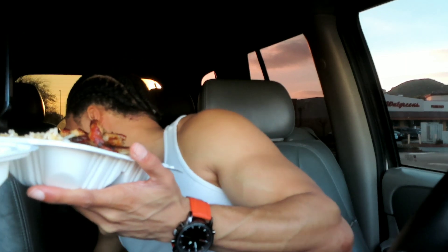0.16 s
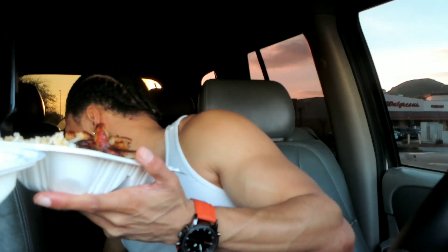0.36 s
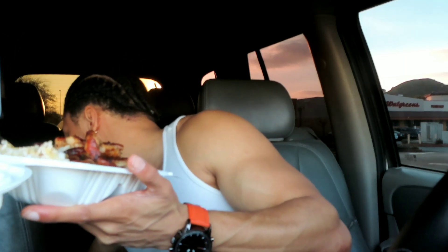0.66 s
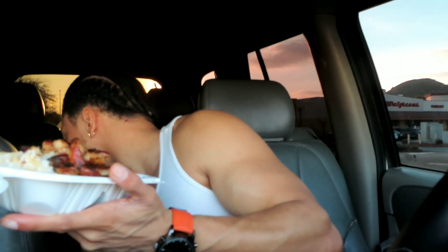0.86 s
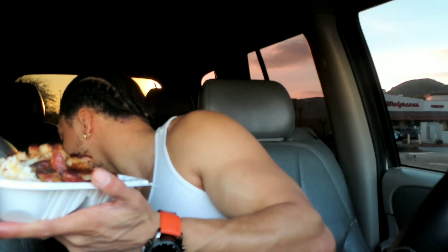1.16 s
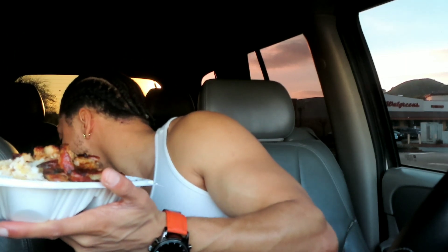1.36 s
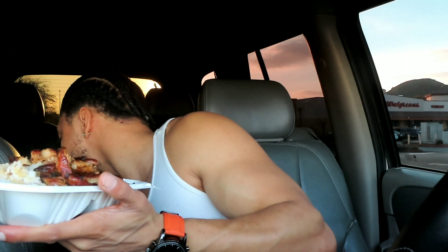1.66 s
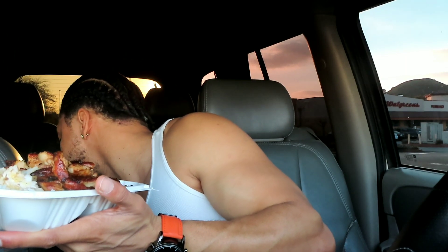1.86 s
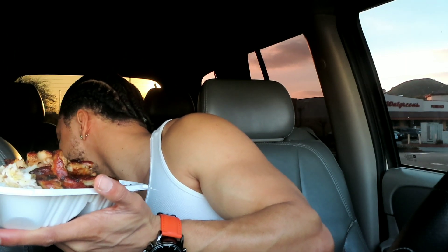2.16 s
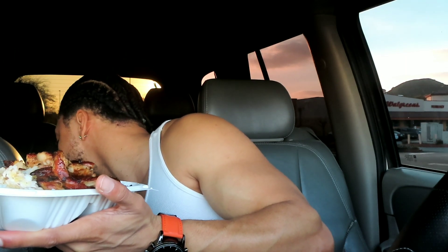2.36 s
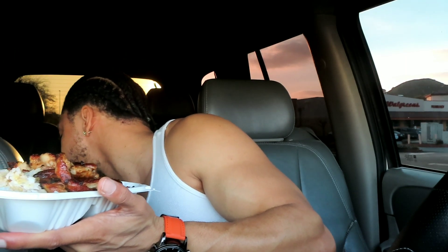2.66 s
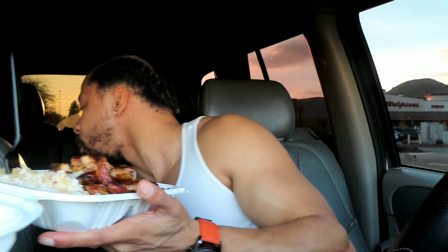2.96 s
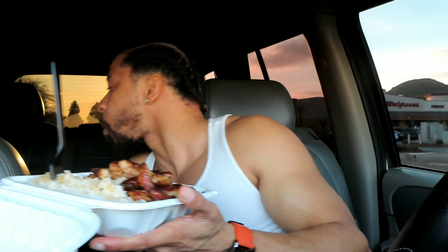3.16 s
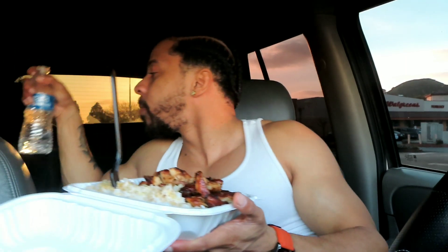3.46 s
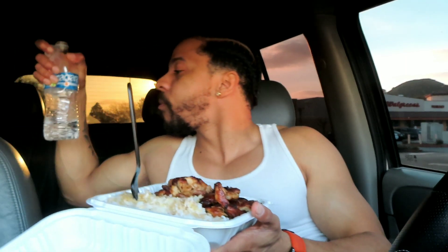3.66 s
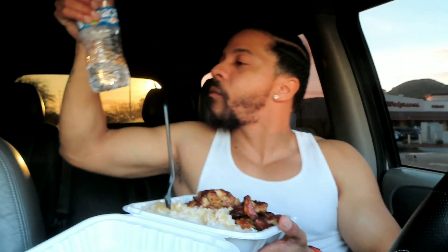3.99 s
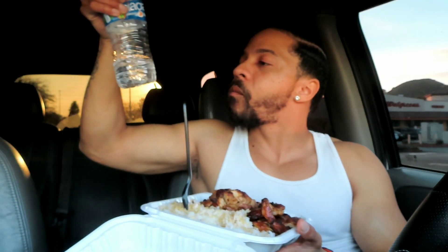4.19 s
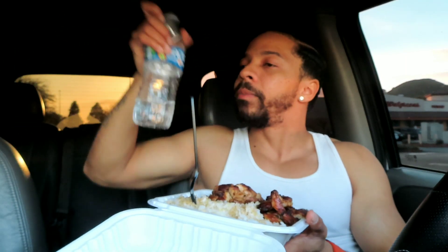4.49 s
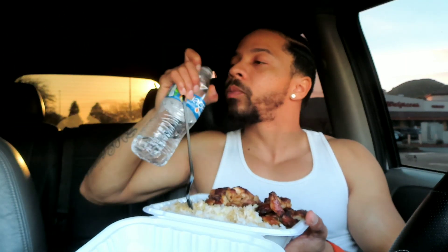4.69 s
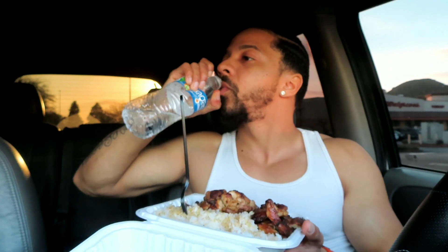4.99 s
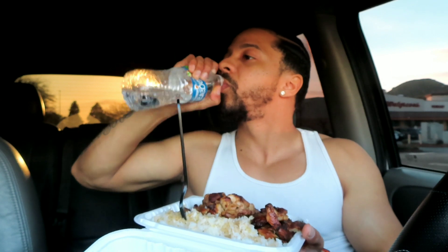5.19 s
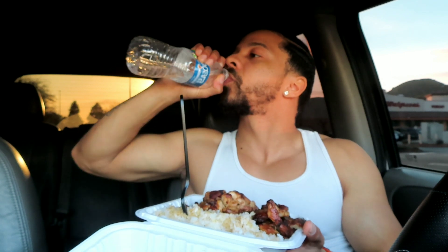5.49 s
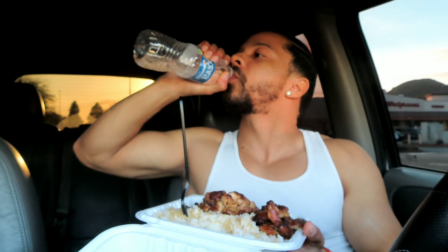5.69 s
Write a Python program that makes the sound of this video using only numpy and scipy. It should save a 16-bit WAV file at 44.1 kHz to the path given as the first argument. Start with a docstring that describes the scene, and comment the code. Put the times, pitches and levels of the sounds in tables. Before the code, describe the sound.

A thin plastic water bottle crackles and snaps in a parked car, faint at first, then sharp loud pops, over low muffled traffic rumble.

```python
"""Traffic rumble runs throughout, with a drone and soft hiss: shaped noise through a parked car's shell.
Over it a thin plastic water bottle snaps as it is gripped, opened and lifted in the cabin.
Each snap is a burst of slips ringing panel, ribs, wall, shell modes and hollow; the padded cabin answers.
Deep dents boom, random ticks crinkle faintly, and the loudest snaps clip the recorder."""
import sys
import numpy as np
from scipy import signal
from scipy.fft import rfft, irfft, next_fast_len
from scipy.io import wavfile
from scipy.ndimage import uniform_filter1d, map_coordinates

SR = 44100
rng = np.random.default_rng(int(sys.argv[2]) if len(sys.argv) > 2 else 0)


def unload_wav(signal):
    """Save mono or channel-first audio to the path in sys.argv[1] as 16-bit WAV at rate SR, clipped to [-1, 1]."""
    wavfile.write(
        sys.argv[1],
        SR,
        np.round(np.clip(np.atleast_2d(signal).T, -1, 1) * 32767).astype(np.int16),
    )


N = 257544
SPAN_SAMPLES = 16384  # holds one snap with its tail


def amp(db):
    """Gain of a level in dB."""
    return 10 ** (np.asarray(db) / 20)


def unit_rms(x):
    """x at rms 1."""
    return x / np.sqrt(np.mean(x ** 2) + 1e-20)


def unit_energy(x):
    """x at energy 1."""
    return x / np.linalg.norm(x)


def along(points, hz):
    """(Hz, value) points read on a log frequency axis."""
    point_hz, value = np.transpose(points)
    return np.interp(np.log(hz + 1), np.log(point_hz + 1), value)


def at_time(points, s):
    """(s, value) points read on a linear time axis."""
    return np.interp(s, *np.transpose(points))


def wobble(knots_per_s):
    """Smooth random curve through normal-distributed knots."""
    knots = rng.standard_normal(int(N * knots_per_s / SR) + 4)
    return map_coordinates(knots, [np.arange(N) * knots_per_s / SR])


def filtered(x, response):
    """x times a complex response of frequency."""
    m = next_fast_len(x.shape[-1] + 4096)
    spectrum = rfft(x, m) * response(np.fft.rfftfreq(m, 1 / SR))
    return irfft(spectrum, m)[..., :x.shape[-1]]


def resonance(f, hz, width_hz):
    """Causal response of one damped resonance, gain 1 at its centre."""
    return 1j * f * width_hz / (hz * hz - f * f + 1j * f * width_hz)


def paired(two, alike, gain):
    """Left and right mixed from two unrelated signals, to a set likeness at each frequency."""
    def mid_side(f):
        turn = np.arccos(np.clip(along(alike, f), -1, 1)) / 2
        return gain(f) * np.array([np.cos(turn), np.sin(turn)])

    mid, side = filtered(two, mid_side)
    return np.array([mid + side, mid - side])


# Stereo width of the steady sounds. Each row: frequency in Hz, left-right likeness from -1 to 1.
OUTSIDE_LIKENESS = [(60, 1.0), (180, 0.99), (550, 0.13), (1650, 0.069), (4970, 0.031), (15000, 0.047)]


def rush(spectrum, patchy_db):
    """Shaped stereo noise of rms 1, with random gain patches in time and frequency."""
    z = signal.stft(rng.standard_normal((2, N + 512)), nperseg=512)[2]
    field = uniform_filter1d(rng.standard_normal(z.shape[1:]), size=6, axis=0)
    field = uniform_filter1d(field, size=10, axis=1)
    patchy = signal.istft(z * amp(patchy_db * unit_rms(field)), nperseg=512)[1][:, :N]
    return unit_rms(paired(patchy, OUTSIDE_LIKENESS, lambda f: amp(along(spectrum, f))))


# Low traffic noise. Each row: frequency in Hz, relative density in dB per Hz.
RUMBLE_SPECTRUM = [(8.8, -35), (15, -12), (54, 3.5), (86, -1.5), (113, -2), (134, -9.5), (179, -19.5),
                   (200, -7.5), (260, -28), (440, -120)]


def rumble(rumble_db):
    """Low noise whose level follows the traffic, made lumpy by a wobble."""
    return amp(rumble_db + 0.62 * wobble(12.0)) * rush(RUMBLE_SPECTRUM, patchy_db=-0.45)


# Mid traffic noise. Each row: frequency in Hz, relative density in dB per Hz.
DRONE_SPECTRUM = [(71, -33), (120, -7.5), (350, -14), (529, -22), (582, -21), (700, -41.5), (910, -56),
                  (1540, -120)]
DRONE_MEAN_DB, DRONE_DB_PER_RUMBLE_DB = -46, .9


def drone(swell_db):
    """Patchy low-mid noise that follows the rumble's swell."""
    level_db = DRONE_MEAN_DB + DRONE_DB_PER_RUMBLE_DB * swell_db + 0.39 * wobble(33)
    return amp(level_db) * rush(DRONE_SPECTRUM, patchy_db=3.63)


# Broadband noise. Each row: frequency in Hz, relative density in dB per Hz.
HISS_SPECTRUM = [(240, -28), (400, -3), (528, -11), (598, -1.5), (867, -5), (981, -5), (1440, -5.5),
                 (12600, -25), (15200, -46.5), (16100, -69)]
HISS_MEAN_DB, HISS_DB_PER_RUMBLE_DB, HISS_FLUTTER_DB = -49.5, 0.65, 1.2


def hiss(swell_db):
    """Soft broadband noise that follows the swell at part strength, with a quick flutter."""
    level_db = HISS_MEAN_DB + HISS_DB_PER_RUMBLE_DB * swell_db + HISS_FLUTTER_DB * wobble(28)
    return amp(level_db) * rush(HISS_SPECTRUM, patchy_db=-0.45)


# Swell of the traffic. Each row: time in seconds, rumble level in dB.
TRAFFIC_LEVEL = [(0.0, -42.5), (0.41, -41), (1.12, -42), (2.3, -43.5), (2.81, -42), (3.5, -43),
                 (3.89, -39.5), (4.13, -41), (4.59, -48), (4.81, -50.5), (5.11, -48.5), (5.629, -44.5),
                 (5.84, -44.5)]


def outside():
    """Traffic through the car's shell: one swell drives rumble, drone and hiss."""
    rumble_db = at_time(TRAFFIC_LEVEL, np.arange(N) / SR)
    swell_db = rumble_db - rumble_db.mean()
    return rumble(rumble_db) + drone(swell_db) + hiss(swell_db)


# Modes of the bottle's shell. Each row: frequency in Hz, width in Hz, relative level in dB.
SHELL_MODES = [(723, 76, 5), (1070, 40, 2), (1440, 210, 0), (1770, 130, 5), (2250, 160, 10), (2900, 170, 7),
               (3480, 81, 3), (4300, 20, -11.5), (4730, 120, -17.5), (6610, 750, 1)]
SHELL_DB_AT_1_MS, SHELL_DB_PER_SLIP_DOUBLING = -5.5, -2  # quick slips ring it harder


def shell_ring(struck, slip_ms):
    """The struck sound rings the shell's modes; the grip changes them a little each time."""
    bend = rng.normal(1, 0.032, len(SHELL_MODES))
    strength_db = rng.normal(0, 1.5, len(SHELL_MODES))

    def modes(f):
        return sum(amp(db + more_db) * resonance(f, hz * shift, width_hz)
                   for (hz, width_hz, db), shift, more_db in zip(SHELL_MODES, bend, strength_db))

    level_db = SHELL_DB_AT_1_MS + SHELL_DB_PER_SLIP_DOUBLING * np.log2(slip_ms)
    return amp(level_db) * np.linalg.norm(struck) * unit_energy(filtered(struck, modes))


# Decay of the cabin. Each row: frequency in Hz, t60 in seconds.
CABIN_DECAY = [(150, 0.19), (500, 0.03), (1500, 0.065), (5000, 0.077), (14000, 0.074)]
# Stereo width of the cabin's answer. Each row: frequency in Hz, left-right likeness from -1 to 1.
CABIN_LIKENESS = [(60, 0.39), (180, 1), (550, 0.97), (1650, 1), (4970, 0.68), (15000, -0.54)]
# What the seats send back. Each row: frequency in Hz, gain in dB.
UPHOLSTERY_GAIN = [(300, -1), (2500, -2.5), (6000, 1.5), (14000, 1.5)]


def cabin_tail():
    """The cabin's short diffuse impulse response: noise dying at its own speed per frequency."""
    noise = rng.standard_normal((2, SPAN_SAMPLES // 2))
    hz, t, z = signal.stft(noise, SR, nperseg=128)
    decay = amp(-60 * t / along(CABIN_DECAY, hz)[:, None])
    tail = signal.istft(z * decay, SR, nperseg=128)[1]
    tail = paired(tail / np.linalg.norm(tail[0]), CABIN_LIKENESS,
                  lambda f: amp(along(UPHOLSTERY_GAIN, f)))
    build_up = 1 - np.exp(-np.arange(tail.shape[1]) / SR / .002)  # surfaces join in
    return tail * build_up


def cabin(x):
    """The cabin's answer to one snap."""
    return signal.fftconvolve(x[None], cabin_tail(), axes=1)[:, :SPAN_SAMPLES]


# Air and water in the bottle. Each row: frequency in Hz, relative level in dB, t60 in seconds.
HOLLOW_MODES = [(239.7, 19.5, 0.13), (467, -20.5, 0.15), (590, -24, 0.14)]


def hollow():
    """A dent softly squeezes the air inside and the hollow rings; energy 1."""
    t = np.arange(SPAN_SAMPLES) / SR
    push = np.exp(-((t - .003) / 0.00077) ** 2)
    ring = sum(amp(db + rng.normal(0, 0.83) - 60 * t / t60) * np.sin(2 * np.pi * hz * t)
               for hz, db, t60 in HOLLOW_MODES)
    return unit_energy(signal.fftconvolve(push, ring)[:SPAN_SAMPLES])


def ring_parts(low, high, hz, panel_width, wall_hz, ribs_db, crack_db, wall_db):
    """Slips ring panel, ribs, crack and wall; panel_width is a share of hz, dB are against the panel."""
    def part(slips, response):
        return unit_energy(filtered(slips, response))

    panel = part(low, lambda f: resonance(f, hz, panel_width * hz) ** 2)
    ribs = part(low, lambda f: resonance(f, 4040, 3200) ** 2)
    crack = part(high, lambda f: resonance(f, 11100, 8900) ** 2)
    wall = part(low, lambda f: resonance(f, wall_hz, 190) ** 2 + 0.44 * resonance(f, 490, 1200) ** 2)
    return panel - amp(ribs_db) * ribs + amp(crack_db) * crack - amp(wall_db) * wall


SQUEEZE_DB = -24  # every snap rings the hollow a little
PORT_LAG_SAMPLES = .9  # left leads right


def snap(hz, wall_hz, ribs_db, crack_db, wall_db, cabin_db, slip_ms):
    """A crease gives way in a burst of uneven slips that rings bottle and cabin."""
    u = np.arange(SPAN_SAMPLES) / SR / (slip_ms / 1000)
    parts = dict(hz=hz, wall_hz=wall_hz, ribs_db=ribs_db, crack_db=crack_db, wall_db=wall_db)
    grains = rng.standard_normal(SPAN_SAMPLES) * amp(1.9 * rng.standard_normal(SPAN_SAMPLES))
    slips = grains * u ** 1.39 * np.exp(-1.3 * u)
    fast_slips = grains * u ** 2 * np.exp(-1.6 * u)  # treble peaks later, once the crease runs fast
    near = ring_parts(slips, fast_slips, panel_width=0.3, **parts)

    # all sides of the bottle, summed up in one jolt
    jolt = 1. * (np.arange(SPAN_SAMPLES) == round(1.3 * slip_ms / 1000 * SR))
    around = ring_parts(jolt, jolt, panel_width=0.91, **parts)
    shell = shell_ring(around, slip_ms)
    near, around = near + shell, around + shell

    def port_lag(f):
        return np.exp(-1j * np.pi * f * PORT_LAG_SAMPLES / SR * np.array([[-1], [1]]))

    direct = filtered(np.array([near, near]), port_lag)
    return direct + amp(cabin_db) * cabin(around) + amp(SQUEEZE_DB) * hollow()


# Fingers working the plastic. Each row: start in seconds, end in seconds, pitch in Hz, level in dB.
CRINKLE_SPELLS = [(0.526, 0.64, 2800, -25), (0.795, 0.95, 2840, -33), (2.618, 2.675, 2200, -26.5),
                  (2.793, 2.94, 1700, -10), (3.36, 3.5, 2220, -19.5), (3.91, 3.97, 2030, -22),
                  (4.068, 4.27, 2300, -32), (4.368, 4.5, 2500, -37), (5.46, 5.517, 1700, -28)]
TICKS_PER_S, TICK_SCATTER_DB = 900, 2.5
TICK_WIDTH = 0.6  # panel bandwidth as a share of its pitch
CRINKLE_CABIN_DB = 7.0


def crinkle():
    """Random ticks of uneven size swell and fade, ring a small panel, and the cabin answers."""
    dry = np.zeros(N)
    t = np.arange(SPAN_SAMPLES) / SR
    for start, end, hz, db in CRINKLE_SPELLS:
        chance, size, sign = rng.random((3, SPAN_SAMPLES))
        swell = np.sin(np.pi * np.clip(t / (end - start), 0, 1))
        strength = amp(db - TICK_SCATTER_DB * np.log(size + 1e-9)) * np.sign(sign - .5)
        ticks = (chance < TICKS_PER_S / SR) * swell * strength
        ringing = filtered(ticks, lambda f: resonance(f, hz, TICK_WIDTH * hz) ** 2)
        dry[round(start * SR):][:SPAN_SAMPLES] += ringing
    answer = cabin_tail()
    return dry + amp(CRINKLE_CABIN_DB) * signal.fftconvolve(dry[None], answer, axes=1)[:, :N]


# Buckling snaps. Each row: start in seconds, level in dB, panel in Hz, wall in Hz,
# crack in dB against the panel, wall in dB against the panel, slip time in ms.
BUCKLING_SNAPS = [(0.009, -17, 1330, 1220, -21, -24, 1.23), (0.115, -25, 2250, 940, -16, 6, 0.99),
                  (0.571, -21.5, 2000, 780, -9.5, -1, 3.8), (0.648, -29.5, 4200, 900, -17, -1, 2.5),
                  (0.74, -24.5, 2230, 390, -30, -19, 1.5), (0.826, -20.5, 2260, 388, -18, 1, 1.43),
                  (0.952, -5.5, 1980, 1030, -18, 1, 1.16), (1.046, -7.5, 1430, 367, -21, -9, 2.3),
                  (1.155, -15.5, 1320, 1070, -33, 1, 0.71), (1.389, -6, 2900, 1106, -13, 2, 1.1),
                  (1.44, -17.5, 1450, 770, -8.5, 1, 1.47), (1.838, -24.5, 1320, 393, -34, 0, 1.37),
                  (2.146, -17, 1610, 1070, -21, -3, 1.4), (2.155, 3, 3840, 1070, -14, 0.5, 2.23),
                  (2.318, -4.6, 1930, 1070, -42, -1, 0.5), (2.456, 2, 1300, 980, -20.5, -6.5, 0.81),
                  (2.483, 0, 1920, 1030, -19, -7, 1.6), (2.53, 11, 2060, 1046, -9.5, -8.5, 2.03),
                  (2.814, -12, 1420, 1070, -8.5, -11, 7.2), (2.827, 4, 2410, 1190, -1.5, -2.5, 2.46),
                  (2.849, -5.4, 1600, 370, -18, -14, 4.8), (2.885, 0, 3700, 705, -13, -8, 2.12),
                  (2.904, -13.5, 1440, 390, -21, -7, 3.5), (2.934, -18, 1740, 1070, -20.5, -3.5, 1.1),
                  (2.952, 9.5, 3560, 1026, -16.5, -16.5, 1.63), (3.002, 9, 3700, 706, -16.5, -14, 3),
                  (3.213, 9, 2060, 922, -19, -9, 1.46), (3.231, -13.5, 2250, 1310, -13, -1.5, 2),
                  (3.394, 8, 2250, 394, -12, -6, 0.43), (3.4153, -2, 1670, 1240, -15.5, -19.5, 0.56),
                  (3.419, 0, 1500, 390, -8, -12.5, 2.35), (3.4365, 10.5, 2250, 1070, -26, 1, 0.25),
                  (3.444, 13.5, 1570, 675, -15.5, -1, 0.62), (3.469, -14, 2200, 660, -7, 10.5, 3.1),
                  (3.509, 0.7, 2290, 381, -13.5, -11, 1.36), (3.5201, 13.5, 1750, 406, -16, -1.5, 0.49),
                  (3.579, -8.5, 1670, 376, -22, -3.5, 0.44), (3.627, -15, 2600, 390, -11, -11, 0.94),
                  (3.71, -7, 1860, 930, -41, -4.5, 1.67), (3.779, -15, 2500, 380, -12.5, 2.5, 1.07),
                  (3.923, -14.5, 1630, 392, -35, 2.5, 6.2), (4.016, -9, 1500, 387, -22, 2, 2.4),
                  (4.0448, 11.5, 1770, 364, -1, 2.5, 1.06), (4.2755, 18, 1910, 1094, -16, -17, 0.37),
                  (4.347, -21.5, 1880, 685, -0.5, -1, 1.1), (4.399, -23, 4300, 700, -6.5, -20, 0.71),
                  (4.41, -30, 4200, 1200, -20, 8, 1.1), (4.523, -16.5, 3660, 496, -10.5, -7.5, 1.57),
                  (4.543, -21.5, 1490, 800, -30, -9.5, 1.5), (4.575, -27, 1890, 900, -28, -1, 2.7),
                  (4.645, -19, 2220, 385, -22, 1, 1.84), (4.692, 15, 1830, 920, -19, -14, 0.34),
                  (4.841, -19, 2760, 468, -16, -10, 0.55), (5.72, -16.5, 2660, 1320, -27, 7, 2.2)]
# Deep dents that make the hollow boom. Each row: start in seconds, level in dB.
DEEP_DENTS = [(0.419, -11), (0.813, -14), (2.157, -3), (2.456, -7), (2.531, 7.5), (2.815, -4),
              (2.884, -8.5), (3.213, -6.5), (3.4424, 13), (3.922, -11), (4.016, -5.5), (4.0446, 3.5),
              (4.442, -8.5)]
# Cabin's share, high while the bottle is hidden, low when held up in the open.
# Each row: time in seconds, level in dB for a 1 ms slip.
LIFT_CABIN_SHARE = [(0.0, 4), (2.4, 5), (3.0, 3.5), (3.25, 3.5), (4.0, -1.5), (4.7, -3.5), (5.7, 3)]
CABIN_DB_PER_SLIP_DOUBLING = 3  # longer slips fill the cabin more
RIBS_DB, RIBS_DB_PER_CRACK_DB, RIBS_MOST_DB = 7.5, 0.99, -4  # ribs ring in step with the crack
LEFT_LEAN_DB = .2  # left up, right down by this much


def bottle():
    """Every snap and dent at its moment and strength, over the crinkle."""
    out = np.zeros((2, N + SPAN_SAMPLES))
    for s, db, hz, wall_hz, crack_db, wall_db, slip_ms in BUCKLING_SNAPS:
        cabin_db = at_time(LIFT_CABIN_SHARE, s) + CABIN_DB_PER_SLIP_DOUBLING * np.log2(slip_ms)
        ribs_db = min(RIBS_DB + RIBS_DB_PER_CRACK_DB * crack_db, RIBS_MOST_DB)
        sound = snap(hz, wall_hz, ribs_db, crack_db, wall_db, cabin_db, slip_ms)
        out[:, round(s * SR):][:, :SPAN_SAMPLES] += amp(db) * sound
    for s, db in DEEP_DENTS:
        out[:, round(s * SR):][:, :SPAN_SAMPLES] += amp(db) * hollow()
    return (out[:, :N] + crinkle()) * amp([[LEFT_LEAN_DB], [-LEFT_LEAN_DB]])


def scene():
    """The bottle over the sounds from outside."""
    return bottle() + outside()


# Treble roll-off of the whole sound. Each row: frequency in Hz, gain in dB.
TREBLE_ROLLOFF = [(20, 1), (9000, -5), (13000, -7.5), (15000, -16.5), (16300, -24.5)]
BAND_LIMIT_HZ = 16290


def record(dry):
    """The top octave fades; the recorder clips, then cuts above its band limit."""
    heard = filtered(dry, lambda f: amp(along(TREBLE_ROLLOFF, f)))
    clipped = heard / (1 + np.abs(heard) ** 12) ** (1 / 12)
    return filtered(clipped, lambda f: f < BAND_LIMIT_HZ)


dry = scene()
out = record(dry)
unload_wav(out)
```